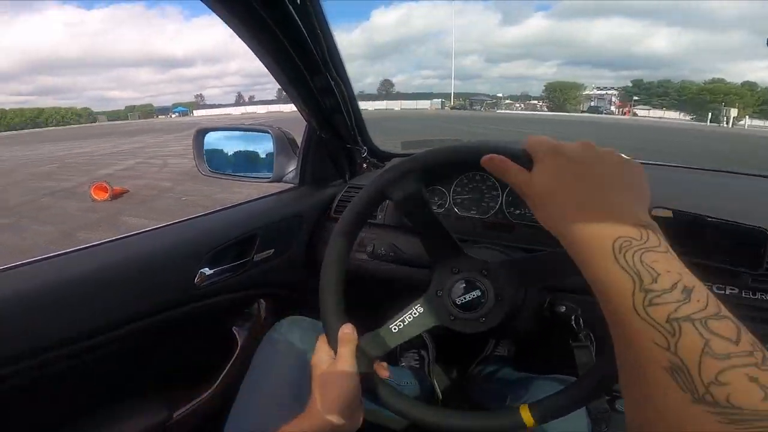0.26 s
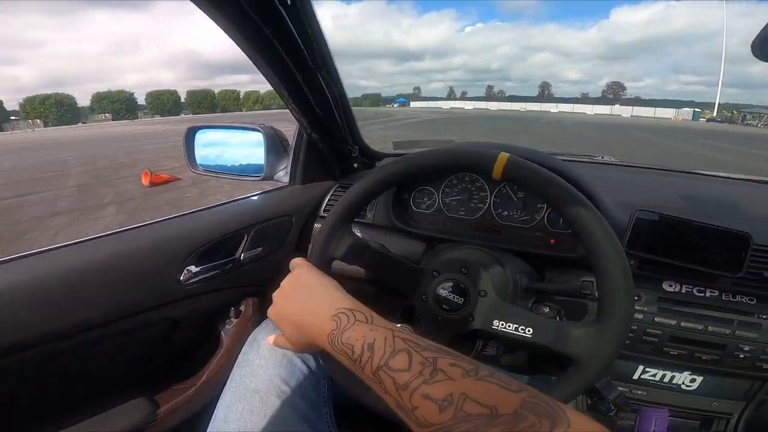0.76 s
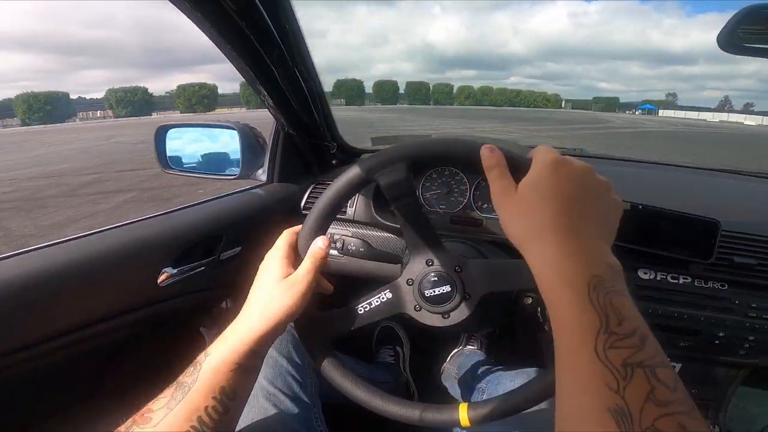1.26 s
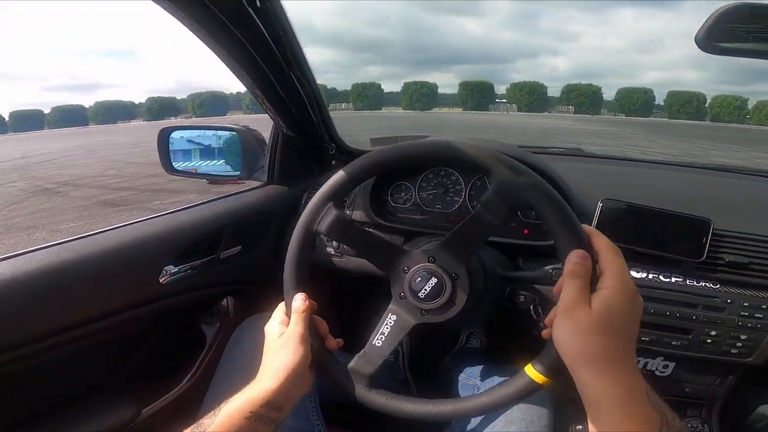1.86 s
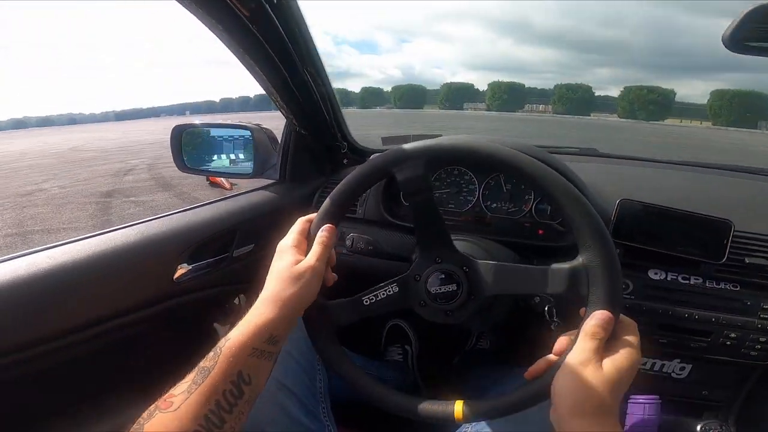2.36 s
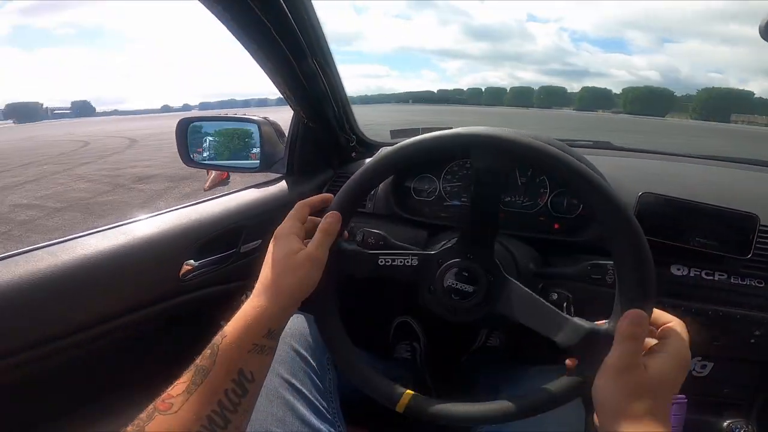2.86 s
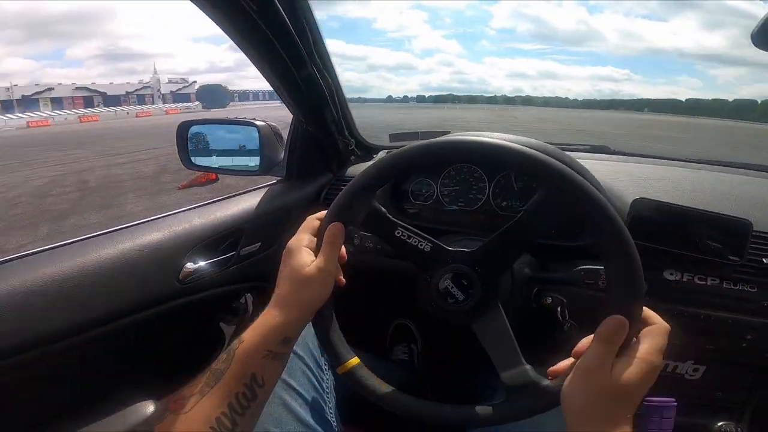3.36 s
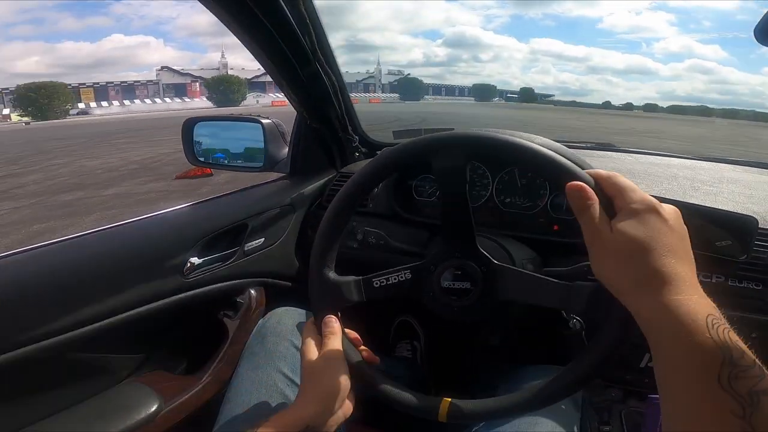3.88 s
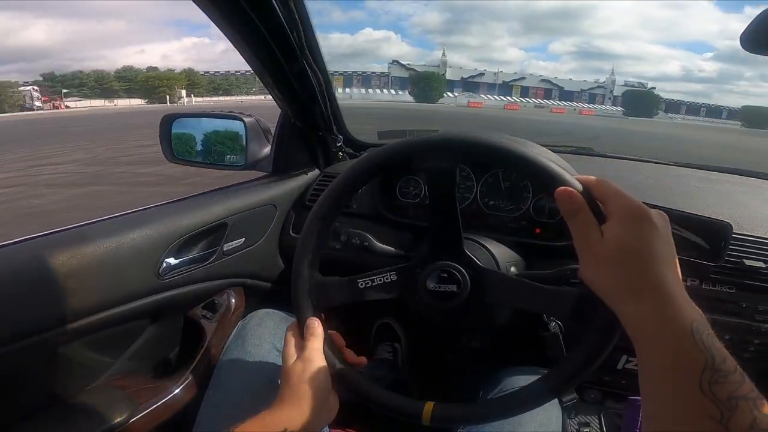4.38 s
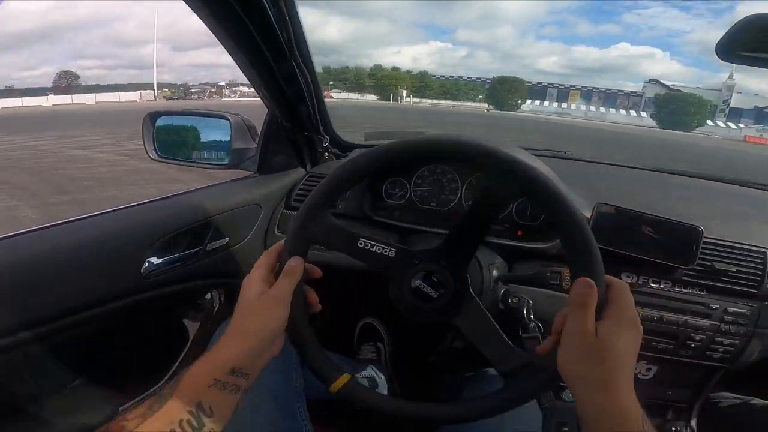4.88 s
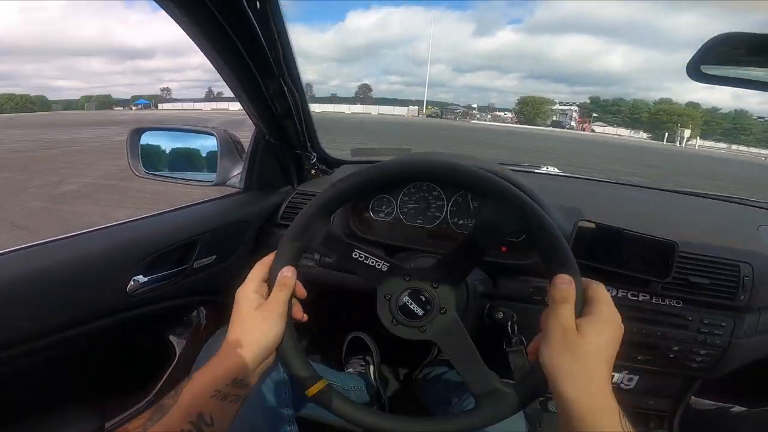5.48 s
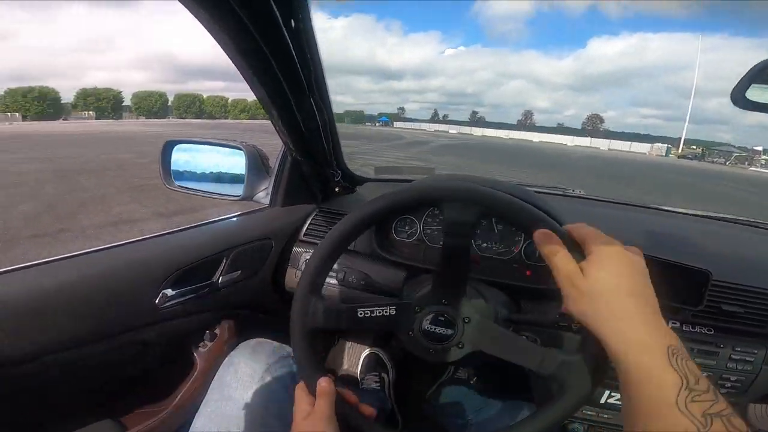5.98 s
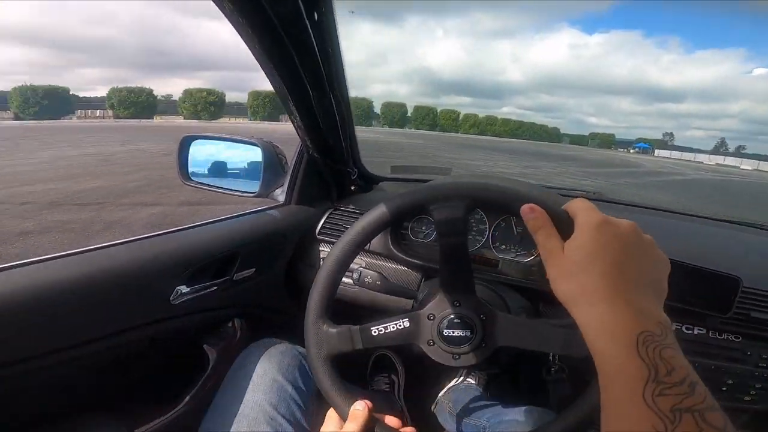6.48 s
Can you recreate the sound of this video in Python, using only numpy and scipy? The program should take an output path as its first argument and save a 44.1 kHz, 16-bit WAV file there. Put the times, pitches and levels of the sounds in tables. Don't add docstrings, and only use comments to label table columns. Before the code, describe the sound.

A car cabin booms with a held engine note, thick and buzzy, while rear tyres squeal continuously in a narrow, fluttering high tone. The revs dip early, recover gradually and peak around three seconds, dip briefly, then stay strong. Road rumble and small jolts come in bursts. The close sound is nearly mono, opening wide with wind buffeting mid-way, then narrowing again.

```python
import sys
import numpy as np
from scipy import signal
from scipy.fft import rfft, irfft, next_fast_len
from scipy.io import wavfile
from scipy.ndimage import uniform_filter1d

SR = 44100
rng = np.random.default_rng(int(sys.argv[2]) if len(sys.argv) > 2 else 0)


def gain_from_db(level_db):
    decades = np.asarray(level_db, float) / 20
    return 10 ** decades


def file_out(sig):
    cols = np.atleast_2d(sig).T
    lim = np.clip(cols, -1, 1)
    pcm = np.round(lim * 32767).astype(np.int16)
    wavfile.write(sys.argv[1], SR, pcm)


N = 296793

# start_s, pulse_hz, load_db
ENGINE = [(0, 71.99, 2.5), (.17, 71.68, 1), (.38, 57.35, -8.5), (.65, 57.56, -5), (.97, 62.34, -3),
          (1.84, 69.7, -1.5), (2.55, 73.78, 2), (3.09, 76.8, 1.5), (3.33, 70.19, -2), (4.22, 75.43, 2.5),
          (4.3, 72.8, 0.7), (4.6, 72.42, 1.2), (5.1, 75.07, 3), (5.45, 72.53, 2.3), (5.56, 70.63, -0.2),
          (5.96, 71.53, 1.2), (6.3, 70.2, -0.9), (6.73, 72.2, 4.5)]
# order_hz, rms_db
LOW_BOOM = [(57, -32), (64, -29.5), (71, -31.5), (77, -25)]
# order_hz, rms_db
BOOM = [(110, -19), (141, -24.5), (153, -36.5), (170, -49.5), (190, -38.5), (214, -33), (230, -37),
        (248, -45), (264, -51.5), (278, -35), (296, -33.5), (330, -42.5), (450, -49), (750, -66.5)]
# start_s, slip_hz, level_db, overtone_bite_db
SQUEAL = [(0, 1175, -29, -44), (.3, 1168, -34, -46), (.38, 1060, -27.5, -44.5), (.46, 1060, -28, -45),
          (.55, 1191, -35.5, -43), (.65, 1070, -32, -44.5), (.72, 1176, -31.5, -44.5),
          (1.1, 1175, -30, -42), (1.27, 1100, -29.5, -43.5), (1.36, 1175, -25.5, -44),
          (1.5, 1171, -30, -42.5), (2.0, 1204, -34, -41.5), (2.6, 1182, -29.5, -41.5),
          (3.28, 1166, -32.5, -39.5), (3.7, 1195, -31, -44.5), (4.8, 1200, -28.5, -44.5),
          (5.8, 1170, -34.5, -45), (6.73, 1195, -25.5, -44)]
# slip_hz, wander_share, level_db, second_overtone_db, third_overtone_db
PATCHES = [(1069, .012, -42.5, -51.5, -63), (1128, .012, -38, -51, -62.5), (1175, .012, -35, -52, -67),
           (1221.4, .015, -36.5, -57, -67), (1248, 0.013, -35.5, -59, -77),
           (1330, .022, -44.5, -63.5, -71.5), (1451, .025, -49, -70.5, -80.5), (994, .035, -47, -56, -68.5)]
# centre_s, level_db
SKIPS = [
    (1.07, -11.5),
    (1.935, -8.5),
    (3.045, -16.5),
    (3.415, -10),
    (3.525, -10),
    (4.075, -8.5),
    (5.525, -6),
    (5.645, -8),
    (5.88, -9.5),
]
# band_hz, density_db (per Hz)
ROAD = [(20, -69.5), (33, -54), (55, -55), (100, -62), (180, -62.5), (330, -70.5), (520, -80), (750, -83),
        (1200, -70.5), (1750, -83.5), (2900, -98), (4800, -106), (7000, -119), (15000, -132)]
# start_s, shake_db
SHAKE = [
    (0, -4.5),
    (.5, 1.5),
    (1.2, -4),
    (1.9, -6.5),
    (2.9, 3),
    (3.3, 0),
    (4.6, 3.5),
    (5.3, 1.5),
    (6.73, -7),
]
# centre_s, rumble_swell_db, knock_db
JOLTS = [(0, -1, 9), (.52, 3.5, 1.5), (.67, 5.5, 3.5), (.91, 7.5, 0.5), (1.12, 4, 2.5), (1.31, 4.5, 1),
         (3.075, 0.5, 9.5), (3.21, -1, 4), (3.3, 2.5, 9), (3.415, 2, 10), (3.67, 7.5, 4), (3.755, 1, 9),
         (3.92, 5.5, 3), (4.27, 4, 1), (6.53, -3, 6), (6.59, 4.5, 0)]
# start_s, width (0-1)
WIDTH = [(0, .02), (.5, 0.02), (1.07, 0.4), (1.84, 0.7), (2.5, 0.9), (3.1, 1.0), (3.4, 1), (3.65, 0.3),
         (4.2, .02), (6.3, .01), (6.73, 0.3)]
# band_hz, left_tilt (0-1), unrelated_share (0-1)
IMAGE = [(40, .01, 0), (300, 0, 0.04), (650, 0, 0.2), (1200, 0.17, 0), (2300, .3, 0.5), (3600, .25, .6),
         (5500, .1, .7), (10000, .05, .4)]
# start_s, peak_db
TICKS = [(.1565, -51), (.457, -51), (.6235, -51), (.7073, -48.5), (.9071, -48.5), (1.1234, -50.5),
         (1.1569, -48.5), (1.5407, -49.5), (1.6243, -47.5), (1.9081, -49.5), (2.2917, -49.5), (2.4077, -49),
         (2.4916, -51.5), (3.126, -48), (3.3762, -50.5), (3.4595, -51.5), (3.627, -51), (3.9604, -50.5),
         (4.127, -50), (4.2936, -49.5), (4.3271, -46.5), (4.3777, -49.5), (4.5441, -50), (4.5774, -49),
         (5.1282, -48.5), (5.2948, -50), (5.8295, -49.5), (6.1624, -49), (6.2446, -48.5), (6.546, -49)]

SPREAD_RAD = .27
HOP_SHARE, HOP_DB, HOPS_PER_S = .016, 2, 15.0
NEAR_SHARE, NEAR_WANDER = 0.97, .022
SKIP_S, JOLT_S, KNOCK_S = 0.0045, 0.046, 0.015
ROAR_FOLLOWS, GRIT_FOLLOWS = 0.21, 0.43
OTHER_TICKS_DB, TICK_SPREAD_DB = -54.5, 6
TICK_LEAN = .5
LIMIT = 0.44


def rms_one(x):
    return x / np.sqrt(np.mean(x ** 2) + 1e-20)


def in_time(rows):
    s, *columns = np.transpose(rows)
    return [np.interp(np.arange(N) / SR, s, column) for column in columns]


def at_hz(points, hz, axis=1):
    table = np.array(points)
    return np.interp(np.log(hz), np.log(table[:, 0]), table[:, axis])


def drift(rate_hz):
    pole = np.exp(-40 * np.pi * rate_hz / SR)
    noise = rng.standard_normal(N // 20 + 4002)
    slow = signal.lfilter([1], [1, -2 * pole, pole * pole], noise)[4000:]
    return np.interp(np.arange(N) / 20, np.arange(len(slow)), rms_one(slow))


def turns(hz):
    return 2 * np.pi * (np.cumsum(hz) / SR + rng.random())


def swells(rows, width_s, axis):
    table, s = np.array(rows), np.arange(0, N, 20) / SR
    bells = np.exp(-((s - table[:, :1]) / width_s) ** 2)
    return np.interp(np.arange(N) / SR, s, table[:, axis] @ bells)


def band_noise(low_hz, high_hz):
    band = signal.butter(2, [low_hz, high_hz], "band", fs=SR, output="sos")
    return signal.sosfilt(band, rng.standard_normal(N))


def engine():
    hz, load_db = in_time(ENGINE)
    hz = uniform_filter1d(hz, size=2000)
    first_db = at_hz(LOW_BOOM, hz) + 0.4 * drift(6.5) + .6 * drift(25)
    phase = turns(hz * (1 + .002 * drift(17)))
    out = gain_from_db(first_db) * np.cos(phase + .55)
    for k in range(2, 11):
        upper = k > 4
        ruffle_db = (0.29 + 1.6 * upper) * drift(6.7)
        blunt_db = (-8.5 + 0.8 * load_db) * upper
        level_db = at_hz(BOOM, k * hz) + load_db + ruffle_db + blunt_db
        out += gain_from_db(level_db) * np.cos(k * phase + SPREAD_RAD * (k - 2) ** 2)
    for k, half_db in ((.5, -46.5), (1.5, -48.5), (2.5, -55), (3.5, -60)):
        out += gain_from_db(half_db + 1.3 * drift(15)) * np.cos(k * phase + 3.8 * drift(9))
    return -np.sqrt(2) * out


def lead_patch(slip_hz, lead_db, hold):
    lead_hz = slip_hz * (1 + HOP_SHARE * drift(HOPS_PER_S))
    lead_db = lead_db + HOP_DB * drift(HOPS_PER_S) + 0.66 * drift(36)
    phase = turns(lead_hz * (1 + 0.009026 * drift(44.9)))
    return hold * gain_from_db(lead_db) * (np.cos(phase) + gain_from_db(-32.0) * np.cos(2 * phase))


def near_tyre(slip_hz, bite):
    near_hz = (slip_hz + np.mean(slip_hz)) / 2 * NEAR_SHARE * (1 + NEAR_WANDER * drift(12.0))
    phase = turns(near_hz * (1 + 0.00839 * drift(51)))
    overtones = gain_from_db(-52.0) * np.cos(2 * phase) + gain_from_db(-68.5) * np.cos(3 * phase)
    return gain_from_db(5.1 * drift(24)) * (gain_from_db(-42.0) * np.cos(phase) + bite * overtones)


def other_patch(patch, pull, hold, bite):
    hz, wander, level_db, second_db, third_db = patch
    scatter = turns(15.0 * drift(100))
    phase = turns(hz * pull ** .6 * (1 + wander * drift(21.99) + 0.00794 * drift(70.2)))
    grip = rms_one(gain_from_db(1.5 * drift(15) + 2.8 * drift(60)))
    phase_2, phase_3 = phase + .5 * scatter, phase + .7 * scatter
    second = gain_from_db(second_db) * np.cos(2 * phase_2)
    third = gain_from_db(third_db) * (np.cos(3 * phase_3) + 0.17 * np.cos(4 * phase_3))
    return grip * (hold * gain_from_db(level_db) * np.cos(phase) + bite * (second + third))


def squeal():
    slip_hz, lead_db, bite_db = in_time(SQUEAL)
    bite_db = bite_db + 1.1 * drift(11.0)
    bite = gain_from_db(bite_db - np.mean(bite_db))
    hold = gain_from_db(swells(SKIPS, SKIP_S, axis=1))
    out = lead_patch(slip_hz, lead_db, hold) + near_tyre(slip_hz, bite)
    pull = uniform_filter1d(slip_hz, size=SR // 4) / np.mean(slip_hz)
    for patch in PATCHES:
        out += other_patch(patch, pull, hold, bite)
    envelope = np.abs(signal.hilbert(out, next_fast_len(N))[:N])
    swing = uniform_filter1d(envelope, size=60)
    return np.sqrt(2) * out * (swing / np.mean(swing) + 0.091) ** -.2


def road():
    shake_db, bite_db = in_time(SHAKE)[0], in_time(SQUEAL)[-1]
    rumble_db = shake_db + swells(JOLTS, JOLT_S, axis=1) + 1.2
    roar_db = ROAR_FOLLOWS * shake_db + swells(JOLTS, KNOCK_S, axis=2) - .6
    grit_db = GRIT_FOLLOWS * (bite_db - np.mean(bite_db)) + 2.0 * drift(16.0)
    out, together = 0, drift(9.1)
    edges = 18 * 2 ** np.arange(0, 10, .4)
    for low, high in zip(edges, edges[1:]):
        hz = np.sqrt(low * high)
        bright = np.clip(np.log2(hz / 60) / 5.5, 0, 1)
        swell_db = (1 - bright) ** 3 * rumble_db + 4 * bright * (1 - bright) * roar_db + bright ** 3 * grit_db
        flicker_db = .8 * together + 1.2 * drift(10)
        out = out + band_noise(low, high) * gain_from_db(at_hz(ROAD, hz) + swell_db + flicker_db)
    return out * np.sqrt(SR / 2)


def wind(width):
    gust = gain_from_db(-45.0 + 5.0 * drift(9))
    flow = rms_one(band_noise(20, 160)) + gain_from_db(-11.5) * rms_one(band_noise(200, 700))
    return width ** 2.5 * gust * flow


def cabin_side(mid, width):
    hz = np.maximum(np.fft.rfftfreq(N, 1 / SR), 1)
    lag_s = .004 + 0.002974 * drift(3.2)[:len(hz)]
    echoes = np.exp(-2j * np.pi * np.cumsum(lag_s) * SR / N)
    tones = rfft(mid)
    tilted = irfft(tones * at_hz(IMAGE, hz), N)
    scrambled = irfft(tones * at_hz(IMAGE, hz, axis=2) * echoes, N)
    return tilted + scrambled * drift(14.0) * width ** .6


def scene():
    mid = engine() + squeal() + road()
    width, = in_time(WIDTH)
    side = cabin_side(mid, width) + wind(width)
    return np.array([mid + width * side, mid - width * side])


def faint_ticks():
    frame = SR / 59.94
    frames = np.arange(int(N / frame))
    tick_s, tick_db = np.array(TICKS).T
    level_db = OTHER_TICKS_DB - TICK_SPREAD_DB * rng.exponential(1, len(frames))
    level_db[np.round((tick_s * SR - 280) / frame).astype(int)] = tick_db
    struck = (frames % 5 == 2) | (frames % 5 == 4)
    spikes = np.zeros(N)
    spikes[np.round(frames * frame + 337).astype(int)] = struck * rng.choice([-1, 1], len(frames))
    spikes[spikes != 0] *= gain_from_db(level_db[struck] + 9.5)
    ticks = signal.sosfilt(signal.butter(1, 2500, "high", fs=SR, output="sos"), spikes)
    return ticks * (1 + TICK_LEAN * in_time(WIDTH)[0] * [[1], [-1]])


def band_limit(x):
    return signal.sosfilt(signal.butter(12, 15800, fs=SR, output="sos"), x)


def record(dry):
    power = uniform_filter1d(np.mean(dry ** 2, axis=0), size=SR // 40)
    even = dry * (power / np.mean(power)) ** -.12
    even[:, :44] *= np.linspace(.2, 1, 44)
    mix = LIMIT * np.tanh(even / LIMIT) + faint_ticks()
    return band_limit(mix)


dry = scene()
out = record(dry)
file_out(out)
```